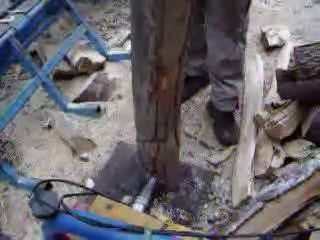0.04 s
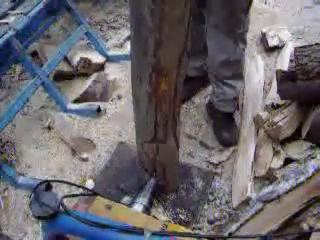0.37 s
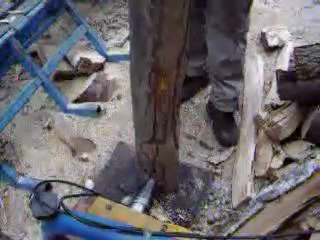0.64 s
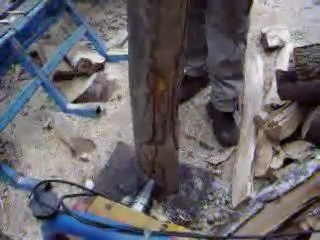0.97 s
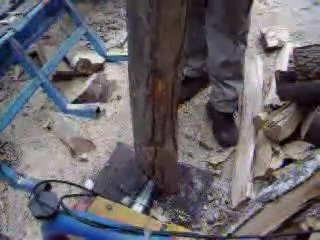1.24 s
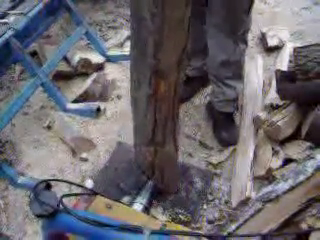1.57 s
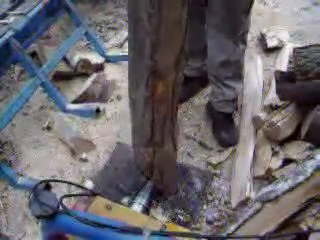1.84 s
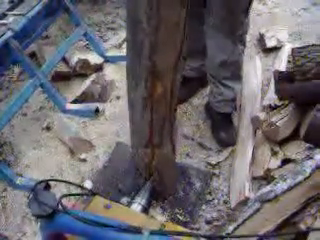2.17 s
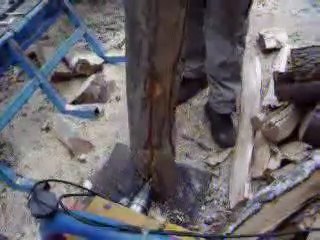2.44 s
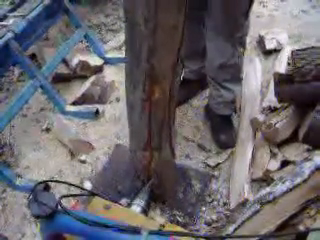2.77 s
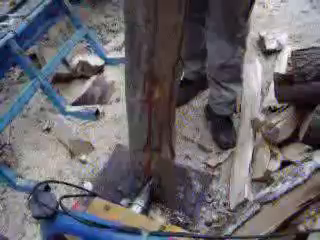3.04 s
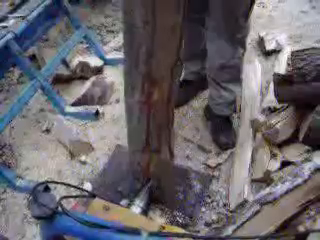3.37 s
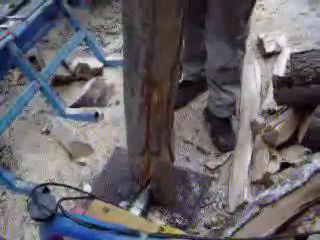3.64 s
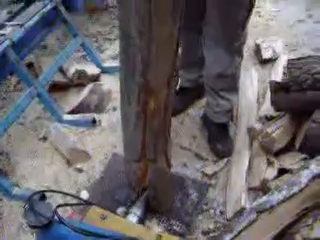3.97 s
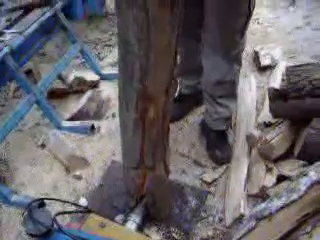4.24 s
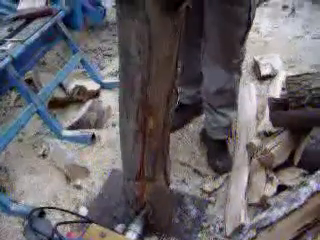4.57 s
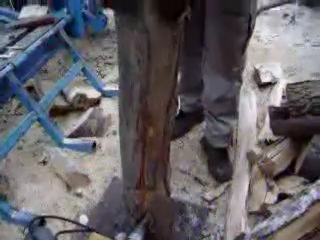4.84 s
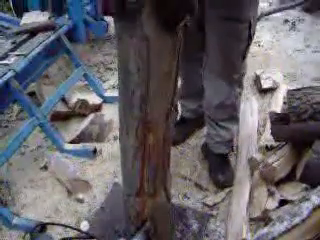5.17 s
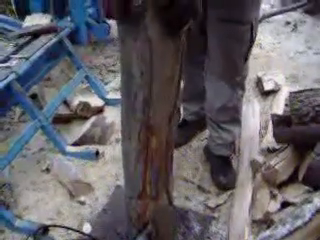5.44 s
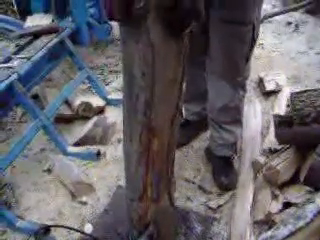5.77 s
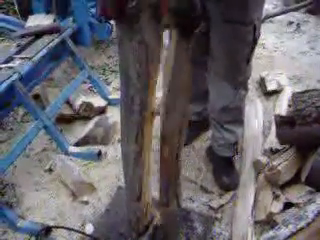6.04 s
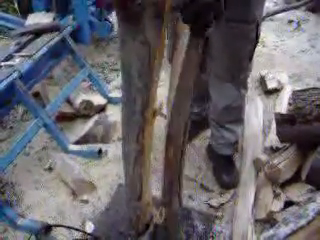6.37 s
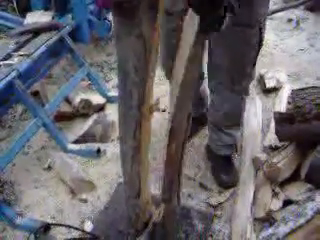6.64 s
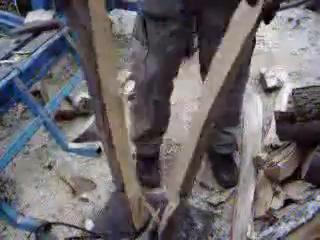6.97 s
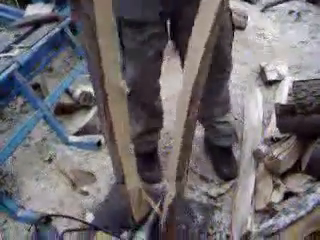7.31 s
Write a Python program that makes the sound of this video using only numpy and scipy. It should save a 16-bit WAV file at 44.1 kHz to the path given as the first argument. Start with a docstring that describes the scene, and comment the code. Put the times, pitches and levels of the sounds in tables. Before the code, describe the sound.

From start to finish, about seven and a half seconds, the small petrol engine of a log splitter drones close by, outdoors. It has a low hum and a buzzing, ringing exhaust. The running gear hisses and whirrs, faint thin whines come and go, and loose steel chatters. Short, bright metal clinks fall irregularly throughout, thickest between 3 and 4.7 seconds. The engine's pitch sinks slightly, in small steps, over the first six seconds as the steel cone bores into a log. The wood gives a dull thud at about 2.6 seconds, a small snap at 3 and a softer thud at 5.2, all partly covered by the engine. Around 6 seconds the log gives way, with a sharp crack just after, then dull tearing of fibres until about 7.2. From 6.3 seconds the engine picks up again and keeps running to the end.

```python
"""Outdoors, close to a log splitter whose screw cone is turned by a small one-cylinder petrol engine.
The engine drones at about 100 firings a second, each one ringing the silencer and puffing out gas.
The running gear hisses, panels whine, and loose steel on the drive chatters and clinks.
The engine sags as the cone bores in. The log gives way with a crack and tearing fibres,
and the engine picks up again. A fast limiter holds the peaks down."""
import sys
import numpy as np
from scipy import signal
from scipy.fft import rfft, irfft, next_fast_len
from scipy.io import wavfile
from scipy.ndimage import uniform_filter1d, minimum_filter1d, map_coordinates

SR = 44100
rng = np.random.default_rng(int(sys.argv[2]) if len(sys.argv) > 2 else 0)


def bounce(signal):
    """Save signal as a 16-bit WAV file at the path given by the first command-line argument."""
    frames = np.transpose(np.atleast_2d(signal))
    limited = np.clip(frames, -1, 1)
    pcm = np.round(limited * 32767).astype(np.int16)
    wavfile.write(sys.argv[1], SR, pcm)


N = 327525
TIME = np.arange(N) / SR


def amp(db):
    """Turn decibels into a number to multiply by."""
    return 10 ** (np.asarray(db) / 20)


def unit(x):
    """Scale a sound to an average (rms) level of 1."""
    return x / np.sqrt(np.mean(x ** 2) + 1e-20)


def curves(rows):
    """Join a table's points with lines: one curve for each column after the time."""
    times, *columns = np.transpose(rows)
    return [np.interp(TIME, times, column) for column in columns]


def wobble(rate):
    """A smooth curve through `rate` random points a second."""
    points = rng.standard_normal(int(N * rate / SR) + 4)
    return map_coordinates(points, [TIME * rate])


def filtered(x, response):
    """Turn each frequency of a sound up or down by response(frequency)."""
    size = next_fast_len(N + SR // 2)
    return irfft(rfft(x, size) * response(np.fft.rfftfreq(size, 1 / SR)), size)[:N]


def coloured(x, spectrum):
    """Shape a sound's lows and highs by a table, then scale it to level 1."""
    hz, db = np.transpose(spectrum)
    return unit(filtered(x, lambda f: amp(np.interp(np.log(f + 1), np.log(hz), db))))


def resonate(x, modes):
    """Pass a sound through an object that rings at the listed pitches."""
    return filtered(x, lambda f: sum(
        (-1) ** k * amp(db) * 1j * f * width / (hz * hz - f * f + 1j * f * width)
        for k, (hz, width, db) in enumerate(modes)))


def near(hz, centre_hz, width_hz):
    """1 at the centre pitch, falling away on both sides."""
    return 1 / (1 + (2 * (hz - centre_hz) / width_hz) ** 4)


def once_a_turn(turns, scatter_db, jitter_s):
    """One click for each turn of the engine, uneven in size and timing."""
    on_time = np.interp(np.arange(1, int(turns[-1])), turns, np.arange(N))
    size, late = rng.standard_normal((len(on_time), 2)).T
    samples = np.clip(np.round(on_time + jitter_s * SR * late), 0, N - 1).astype(int)
    return np.bincount(samples, amp(scatter_db * size), N)


# The engine slows in steps as the cone bites, then recovers: (time [s], firing rate [Hz])
ENGINE_SPEED = [(0.0, 107.4), (0.31, 105.4), (0.37, 106.3), (0.99, 104.6), (2.5, 104.1), (2.67, 101.2),
                (3.43, 101), (3.56, 99.8), (3.83, 99.17), (4.47, 100), (4.78, 97.34), (5.05, 98.6),
                (5.21, 96.83), (5.73, 96.94), (6.12, 95.1), (6.25, 96.9), (6.27, 95.1), (6.51, 99.73),
                (6.85, 102.1), (7.43, 103.8)]


def crank():
    """The engine fires once a turn. Give its speed and a running count of its turns."""
    speed, = curves(ENGINE_SPEED)
    return speed, np.cumsum(speed + .15 * wobble(14)) / SR


# The deep exhaust note: (time [s], firing tone's relative level [dB], octave's relative level [dB])
DRONE_LEVELS = [(0, -19.5, -22.5), (.6, -20, -20.5), (1.05, -20.5, -24.5), (1.5, -20.5, -26),
                (2.15, -21.5, -23), (2.45, -23, -25.5), (2.9, -20, -24.5), (3.7, -21.5, -23),
                (4.6, -22.5, -25.5), (5.05, -22, -22.5), (5.7, -23, -30.5), (6.3, -22, -27),
                (6.6, -18.5, -27.5), (6.9, -21.5, -31), (7.25, -21, -22.5)]


def drone(speed, turns):
    """The exhaust hums three clean tones, at one, two and three times the firing rate."""
    firing_db, octave_db = curves(DRONE_LEVELS)
    # The octave throbs about five times a second with a slow shaft, probably the cone's.
    since_throb = turns - np.interp(0.17, TIME, turns)
    throb_db = 2 * np.cos(2 * np.pi * .049 * since_throb)
    # The third tone swells as it passes the pitch at which the pipe rings.
    pipe_db = 10 * near(3 * speed, centre_hz=309.3, width_hz=15)
    levels = [firing_db + 1.5 + .9 * wobble(18),
              octave_db + 1 + throb_db + 2.9 * wobble(24),
              -30.3 + pipe_db + 2.2 * wobble(16)]
    return np.sqrt(2) * sum(amp(db) * np.cos(2 * np.pi * k * turns) for k, db in enumerate(levels, 1))


# Where the silencer and housing ring: (pitch [Hz], width [Hz], relative level [dB])
SILENCER_RINGS = [(383.4, 5.5, -30), (418, 28, -27), (488.6, 16.4, -23), (597.5, 19, -26),
                  (631.5, 16, -24.5), (678.1, 22.3, -15.5), (734, 14.4, -14.5), (804.3, 30.6, -20.5),
                  (868, 13, -25.5), (914.6, 33, -24), (983, 33.4, -22.5), (1071, 23, -30), (1203, 70, -34),
                  (1324, 11, -49), (1455, 150, -44), (1630, 36, -51.5)]
# The tone of the rushing gas: (frequency [Hz], relative level [dB])
GAS_TONE = [(20, -18.5), (70, -14), (150, -7.5), (260, -8.5), (350, -3), (460, -7.5), (570, -5.5), (690, 1),
            (780, 1), (860, 1), (970, 0.5), (1120, -9), (1350, -19.5), (2500, -68)]
# How strong the exhaust is: (time [s], ring's relative level [dB], gas's relative level [dB])
EXHAUST_LEVELS = [(0, -16.5, -15.5), (.5, -15.5, -17), (1.4, -15, -17.5), (2.4, -15.5, -19.5),
                  (2.9, -16, -18), (3.5, -16, -18.5), (4, -14, -22), (4.5, -17, -18.5), (4.9, -14, -19.5),
                  (5.2, -14.5, -18), (5.7, -14.5, -20), (6.1, -13.5, -16.5), (6.8, -17, -17),
                  (7.43, -16.5, -17)]


def exhaust(turns):
    """Every firing rings the silencer and lets out a puff of swirling gas."""
    ring_db, gas_db = curves(EXHAUST_LEVELS)
    firings = once_a_turn(turns, scatter_db=1.5, jitter_s=.00002)
    ring = unit(resonate(firings, SILENCER_RINGS)) * amp(ring_db - 0.6 + 1.48 * wobble(8))
    gas = coloured(puffs(turns, depth=0.41), GAS_TONE) * amp(gas_db + 0.74 + 0.51 * wobble(11))
    return ring + gas


def puffs(turns, depth):
    """Noise that swells once a turn."""
    return rng.standard_normal(N) * np.exp(depth * np.cos(2 * np.pi * turns))


# Where the loose steel rings: (pitch [Hz], width [Hz], relative level [dB])
STEEL_RINGS = [(2096, 41, 0.5), (2252, 108, 0), (2328, 86, 3), (2684, 110, -14.5), (2720, 63, -14.5),
               (2940, 180, -26.5), (3200, 50, -15), (4146, 110, -18.5), (4430, 43, -26)]
# The drive's noise: (time [s], chatter's relative level [dB], whirr's relative level [dB])
DRIVE_LEVELS = [(0.0, -25, -29), (0.04, -18, -30), (0.29, -21.5, -30.5), (2.29, -24, -31),
                (3.0, -23, -29.5), (4.28, -27.5, -31.5), (4.43, -25, -30), (4.45, -29, -31),
                (4.67, -22.5, -32), (7.3, -22, -30), (7.34, -23, -30), (7.43, -17, -31)]


def chatter(turns):
    """Loose steel is tapped once a turn, hardest when the slower pulley swings it into contact."""
    chatter_db, _ = curves(DRIVE_LEVELS)
    pulley = np.cos(2 * np.pi * (.31 * turns + .15 * wobble(12)))
    taps = once_a_turn(turns, scatter_db=3.0, jitter_s=.00005) * amp(2 * pulley)
    return unit(resonate(taps, STEEL_RINGS)) * amp(chatter_db - 2.5)


# The tone of the running gear: (frequency [Hz], relative level [dB])
GEAR_TONE = [(700, -2), (1300, -3), (1700, 1), (2100, 5), (2550, 2.5), (2850, 5), (3400, -4.5), (3900, -3),
             (4300, 0), (4800, -6), (5500, -13), (6400, -21.5), (7100, -36.5)]


def whirr(turns, ring_s):
    """The running gear hisses, and its ticks scatter through the frame as a fine buzz."""
    _, whirr_db = curves(DRIVE_LEVELS)
    hiss = coloured(puffs(turns, depth=0.18) * amp(2.1 * wobble(300)), GEAR_TONE)
    t = TIME[:SR // 10]
    frame_ring = rng.standard_normal(len(t)) * np.exp(-np.log(1000) * t / ring_s)
    ticks = once_a_turn(turns, scatter_db=2.2, jitter_s=.000012)
    buzz = coloured(signal.fftconvolve(ticks, frame_ring)[:N], GEAR_TONE)
    return amp(whirr_db) * (amp(5.5) * hiss + amp(0.5) * buzz)


# Each panel sings around one engine speed:
# (pitch [times the firing rate], firing rate [Hz], width [Hz], relative level [dB])
PANEL_NOTES = [(4, 102, 2, -27), (4, 95.5, 1.8, -29), (8, 101.5, 1.5, -24), (10, 99.3, 2.4, -24),
               (12, 95.5, 1.5, -24.5), (13, 97.3, 1.4, -37), (20, 104.2, 1.5, -36), (21, 99.4, 1.3, -34),
               (22, 101.4, 1.2, -29.5), (22, 106, 0.84, -26.5), (29, 95.5, 2.1, -36.5),
               (42, 104.1, 1.5, -41.5), (43, 97.2, 2, -43)]


def panel_whines(speed, turns):
    """Thin whines come and go as the engine passes the speeds that make its panels ring."""
    whines = np.zeros(N)
    for multiple, rate_hz, width_hz, db in PANEL_NOTES:
        strength = amp(db - 0.5 + 2.9 * wobble(30)) * near(speed, rate_hz, width_hz)
        whines += strength * np.sin(2 * np.pi * round(multiple) * turns)
    return np.sqrt(2) * whines


# The hardest clinks of the loose steel: (time [s], relative level [dB])
HARD_CLINKS = [(0.6353, -8), (0.7206, -5), (0.9507, -9), (1.4203, -8), (1.4875, -4), (2.1313, -8),
               (2.5253, -9), (2.6329, -4), (2.8, -6), (3.1553, -10), (3.1847, -6), (3.4212, -8),
               (3.471, -7), (3.4999, -8), (3.5399, -4), (3.5703, -3), (3.741, -4), (3.8316, -9),
               (4.0941, -9), (4.1735, -4), (4.4451, -7), (4.4743, -5), (4.505, -9), (4.5361, -12),
               (4.566, -10), (4.6056, -3), (4.6473, -11), (4.78, -12), (5.0761, -7), (5.3243, -11),
               (5.3549, -7), (5.5717, -10), (5.8397, -7), (6.0182, -10), (6.3111, -9.5), (6.3844, -10),
               (6.6164, -13), (6.7735, -3), (6.9207, -6), (7.1641, -8)]


def clinks(turns, pitch_hz, rise_s, light_chance):
    """Now and then the steel catches: a ring that swells and dies within milliseconds."""
    t = TIME[:SR // 40]
    swell = (t / rise_s * np.exp(1 - t / rise_s)) ** 3
    # Every third turn brings a chance of a light clink.
    chances = np.interp(np.arange(1, int(turns[-1]), 3), turns, TIME)
    light = [(start, -17.5 + 4 * size, luck < light_chance)
             for start, (luck, size) in zip(chances, rng.random((len(chances), 2)))]
    catches = [(start, db, True) for start, db in HARD_CLINKS] + light
    track = np.zeros(N + SR)
    for (start, db, caught), detune in zip(catches, rng.standard_normal(len(catches))):
        ring = swell * np.sin(2 * np.pi * pitch_hz * (1 + .012 * detune) * t)
        track[round(start * SR):][:len(t)] += caught * amp(db + 3) * ring
    return track[:N]


# The wood cracks and tears: (middle time [s], fade in or out [s], thud level [dB], snap level [dB])
WOOD_CRACKS = [(2.626, 0.038, -18, -49), (3.023, 0.023, -45, -28), (5.174, 0.093, -26, -59),
               (5.954, 0.095, -21.5, -36), (6.148, 0.011, -24, -19), (6.222, 0.15, -18, -55),
               (6.47, 0.16, -24, -48), (6.848, 0.35, -21, -37)]
# The tone of the log's thud: (frequency [Hz], relative level [dB])
THUD_TONE = [(25, -3), (70, 0.5), (170, 0.5), (330, 4), (520, 2.5), (1200, -18.5), (3000, -56)]
# The tone of the snapping fibres: (frequency [Hz], relative level [dB])
SNAP_TONE = [(600, -21.5), (1700, 0.5), (3200, 5.5), (4500, 9.5), (5800, -1), (6600, -14.5), (7300, -26)]


def splitting():
    """Bundles of fibres snap in bursts, and the log answers with a dull thud."""
    thuds, snaps = np.zeros(N), np.zeros(N)
    for middle_s, fade_s, thud_db, snap_db in WOOD_CRACKS:
        burst = np.exp(-2 * ((TIME - middle_s) / fade_s) ** 2)
        thuds += amp(thud_db) * burst
        snaps += amp(snap_db) * burst
    fibres = rng.standard_normal(N) * amp(3 * wobble(600))
    return thuds * coloured(fibres, THUD_TONE) + snaps * coloured(fibres, SNAP_TONE)


def limiter(x, ceiling, hold_s):
    """Turn the sound down for a moment around every peak above the ceiling."""
    size = int(hold_s * SR)
    needed_gain = ceiling / np.maximum(np.abs(x), ceiling)
    return x * uniform_filter1d(minimum_filter1d(needed_gain, size), size)


def scene():
    """The turning crank sets the beat of the engine and drive; the wood breaks in its own time."""
    speed, turns = crank()
    engine = drone(speed, turns) + exhaust(turns)
    steel = chatter(turns) + clinks(turns, pitch_hz=2235, rise_s=0.0018, light_chance=.25)
    gear = whirr(turns, ring_s=0.12) + panel_whines(speed, turns)
    return (engine + steel + gear + splitting())[None]


def record(dry):
    """Hold the peaks down and cut away the treble above 7050 Hz."""
    held = limiter(dry[0], ceiling=.6, hold_s=0.0022)
    return filtered(held, lambda hz: 1 / np.sqrt(1 + (hz / 7050) ** 150))[None]


dry = scene()
out = record(dry)
bounce(out)
```